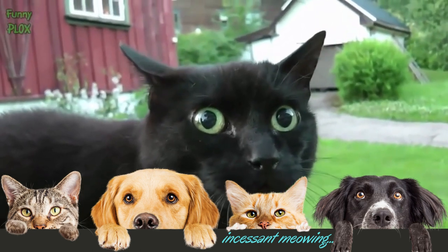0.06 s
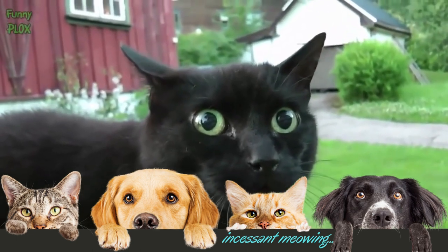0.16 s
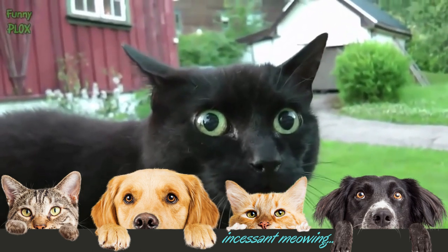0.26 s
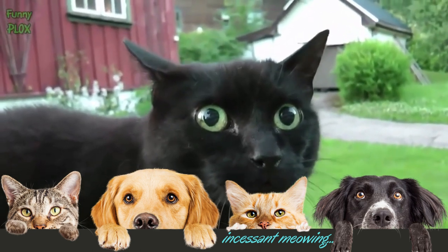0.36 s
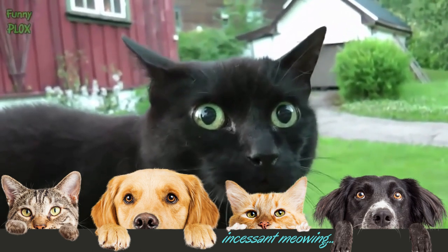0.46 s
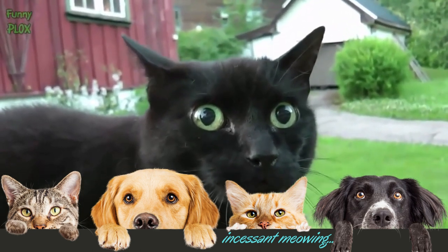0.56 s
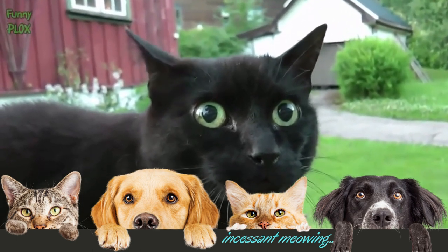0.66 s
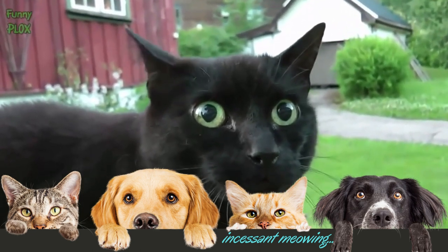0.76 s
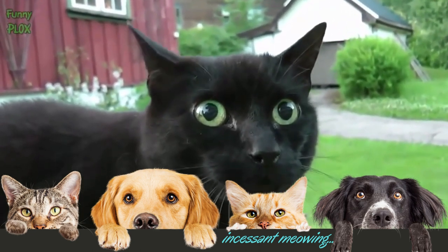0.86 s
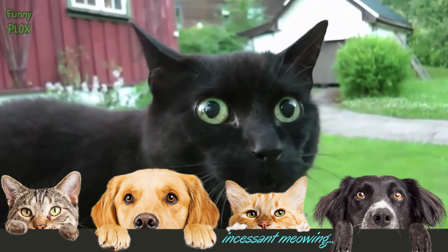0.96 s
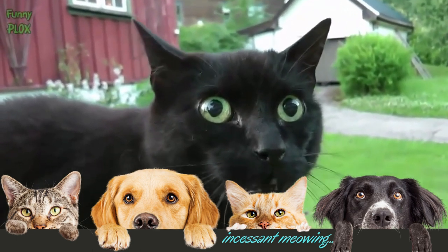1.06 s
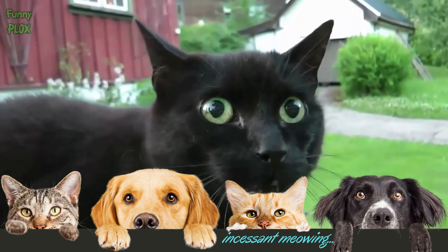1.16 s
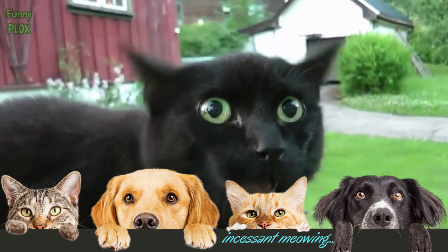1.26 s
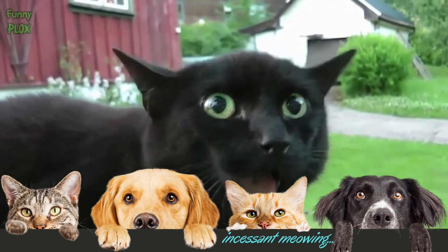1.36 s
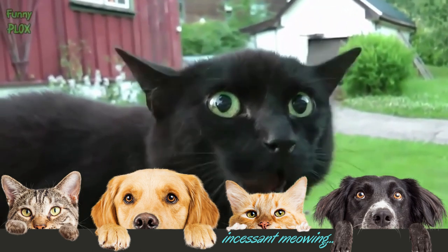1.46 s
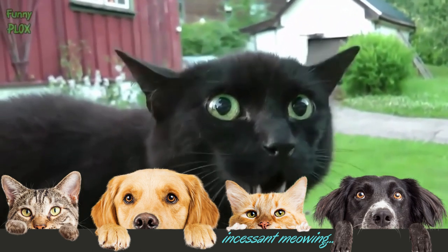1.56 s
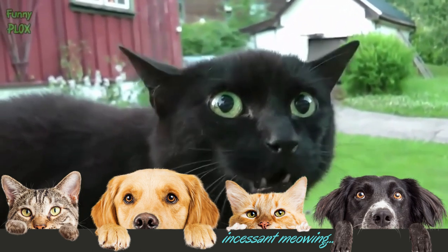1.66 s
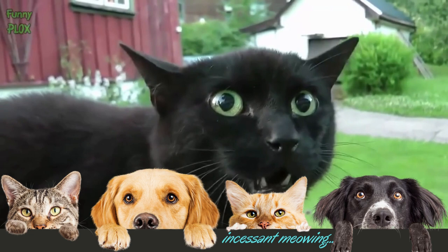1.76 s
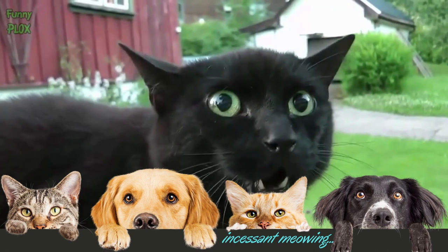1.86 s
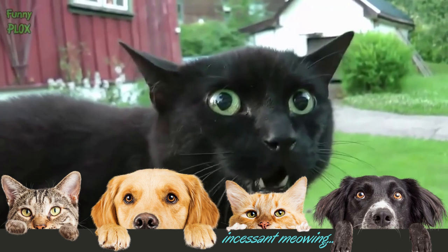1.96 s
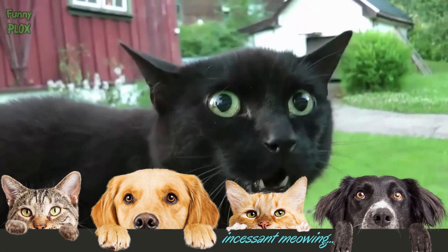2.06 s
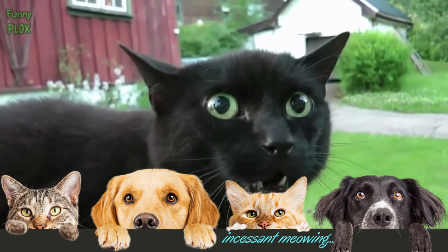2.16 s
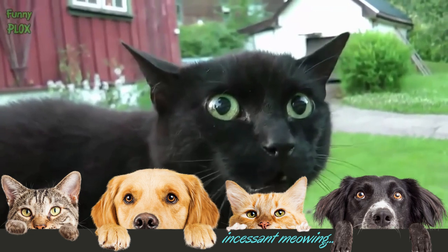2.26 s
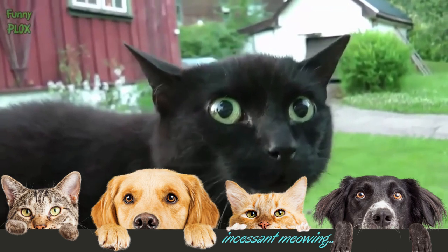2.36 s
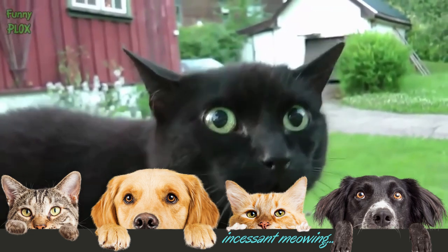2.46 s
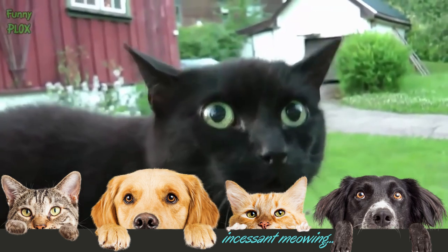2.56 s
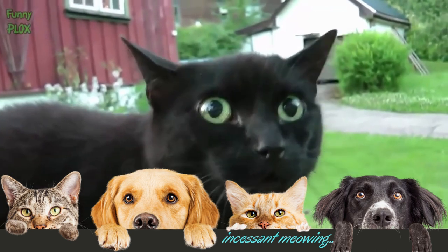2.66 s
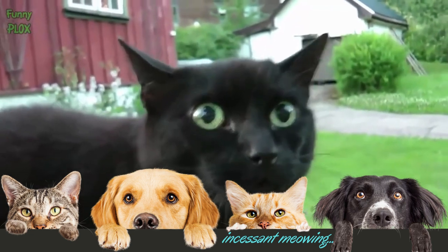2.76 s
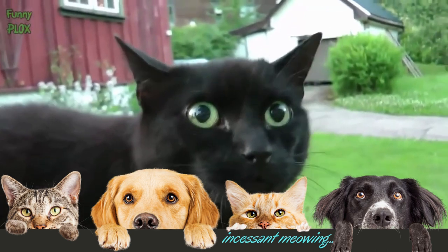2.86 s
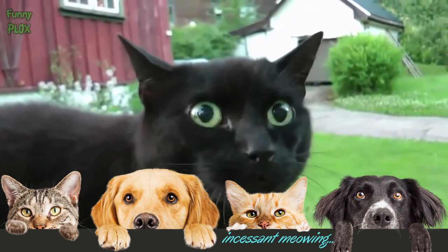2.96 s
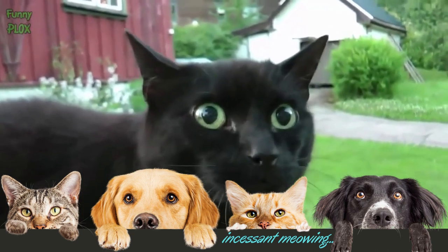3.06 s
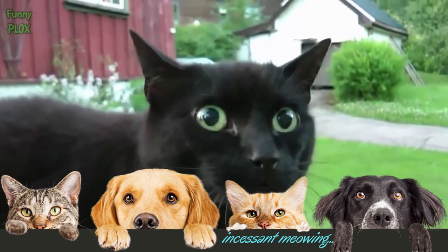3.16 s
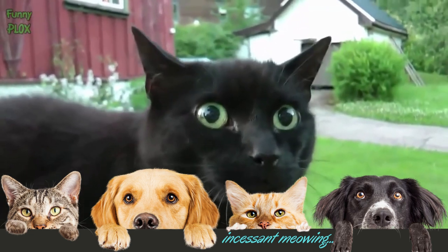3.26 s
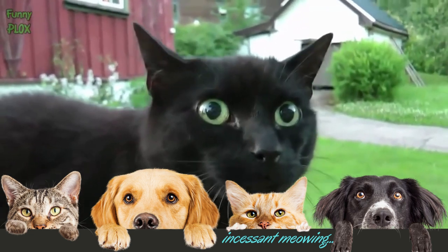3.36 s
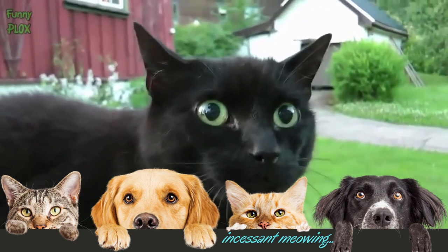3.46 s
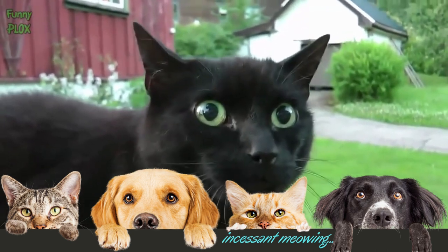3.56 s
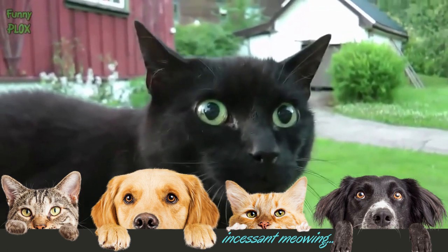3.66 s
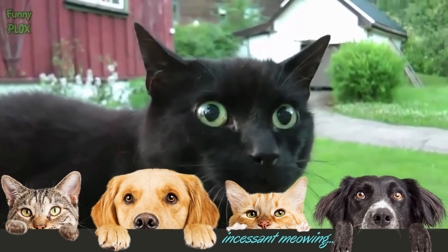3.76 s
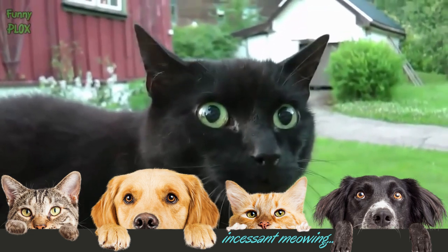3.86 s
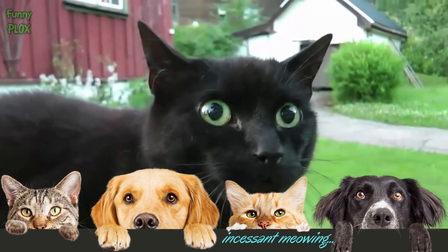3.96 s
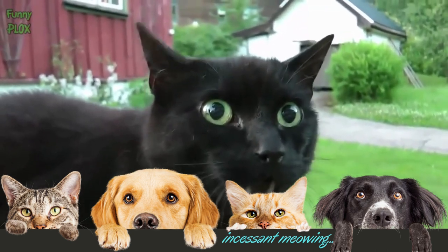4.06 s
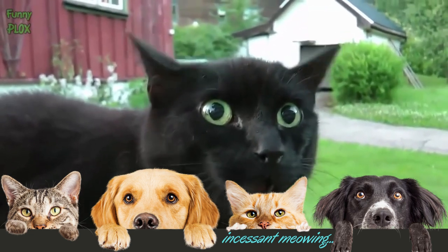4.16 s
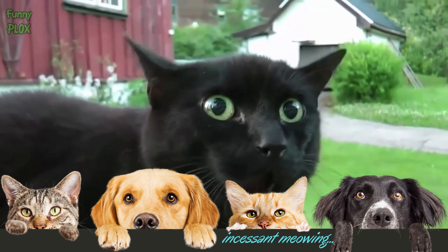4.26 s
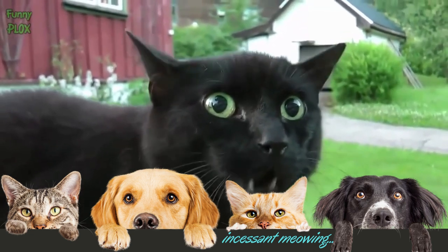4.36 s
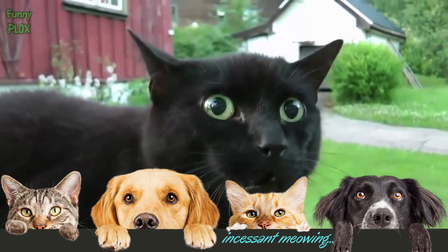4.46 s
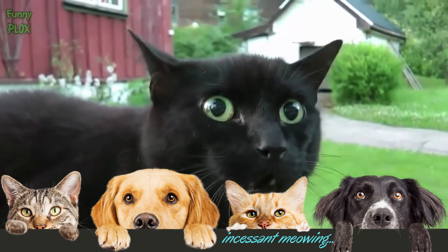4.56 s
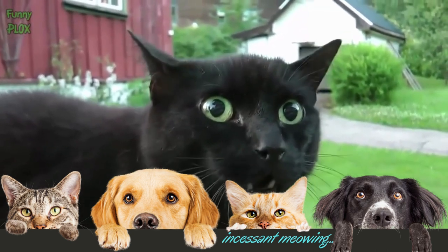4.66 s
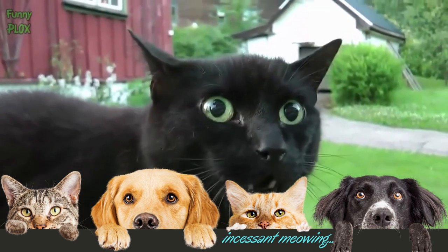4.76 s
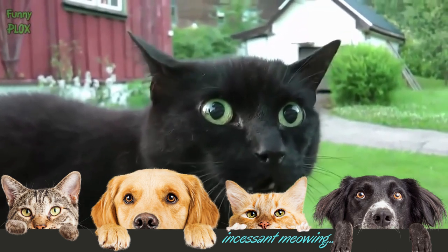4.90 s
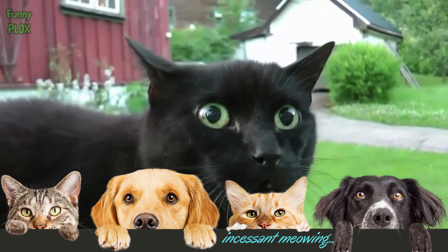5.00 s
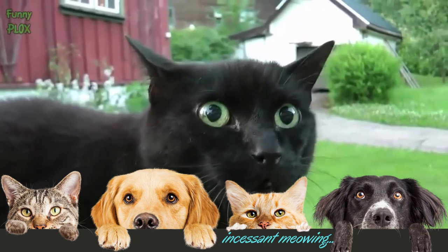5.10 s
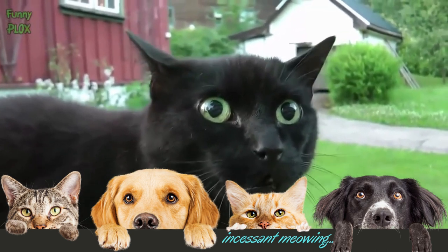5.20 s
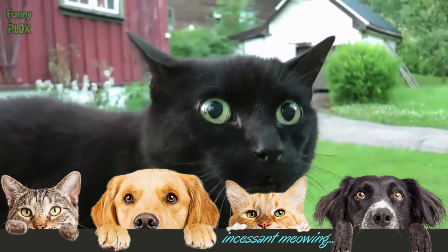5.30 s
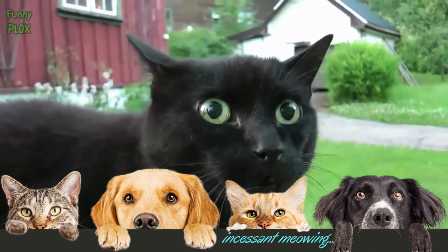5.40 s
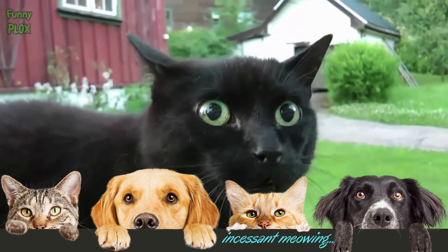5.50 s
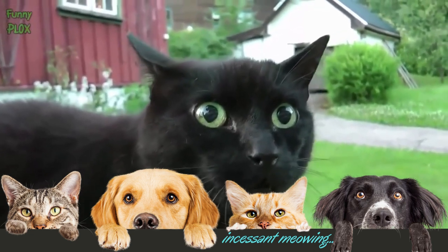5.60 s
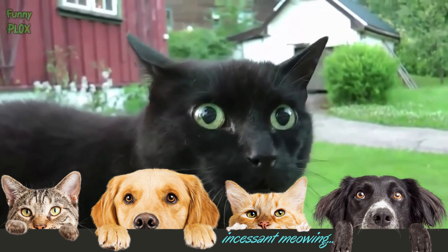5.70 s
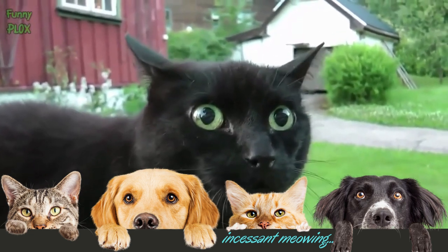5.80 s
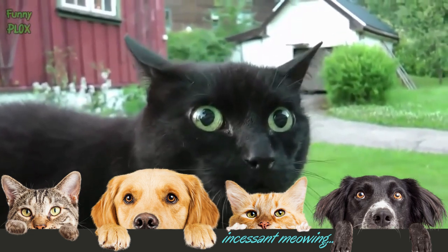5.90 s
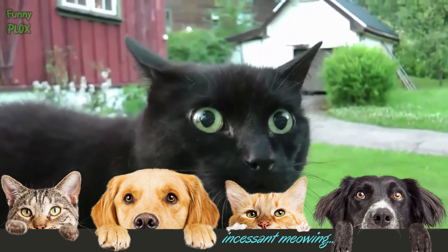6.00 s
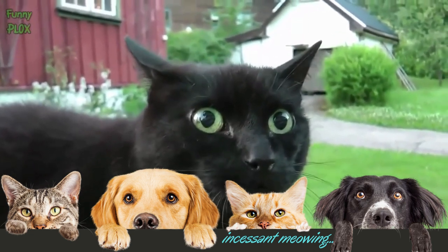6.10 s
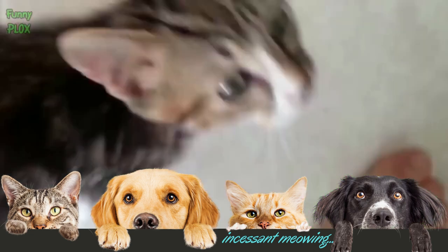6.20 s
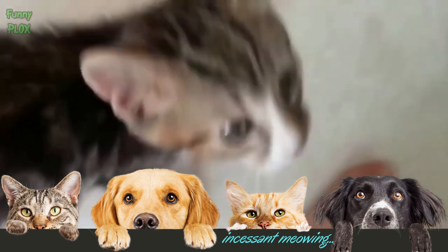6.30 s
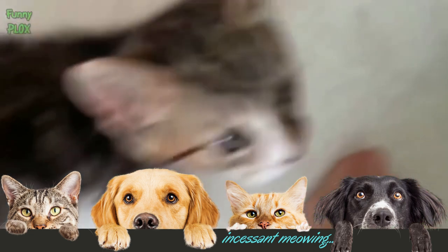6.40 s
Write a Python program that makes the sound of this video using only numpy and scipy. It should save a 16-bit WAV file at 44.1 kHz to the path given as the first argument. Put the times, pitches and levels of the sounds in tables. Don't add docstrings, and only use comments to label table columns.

```python
import sys
import numpy as np
from scipy import signal
from scipy.fft import rfft, irfft
from scipy.io import wavfile
from scipy.ndimage import uniform_filter1d

SR = 44100
rng = np.random.default_rng(int(sys.argv[2]) if len(sys.argv) > 2 else 0)


def to_wav(sig):
    pcm = np.clip(np.atleast_2d(sig), -1, 1) * 32767
    pcm = np.round(pcm).astype(np.int16)
    wavfile.write(sys.argv[1], SR, pcm.T)


def convert_level_to_amplitude(level_db):
    exponent = np.asarray(level_db, float) / 20
    return 10 ** exponent


N = 284004

# [t/s, f/Hz]
YOWL_PITCH = [
    [(-.06, 372)],
    [(1.425, 473.6), (1.5, 491), (1.6, 473.3), (1.68, 452.7), (1.78, 463), (1.86, 478.3), (2.31, 462.2),
     (2.53, 428.3), (2.755, 405.7)],
    [(4.305, 485.5), (4.417, 514.4), (4.54, 430.6), (4.66, 458.5), (4.77, 465.7), (4.92, 475),
     (5.12, 471.1), (5.33, 456.2), (5.62, 424.6)],
]
# [t/s, level/dB]
YOWL_EFFORT = [
    [(-.06, -37.5)],
    [(1.425, -37.5), (1.51, -31.5), (1.58, -23), (1.765, -25), (1.805, -31.5), (2.0, -24.5), (2.46, -27.5),
     (2.54, -27), (2.6, -28.5)],
    [(4.305, -33), (4.39, -34), (4.454, -26), (4.54, -25), (4.583, -36), (4.75, -27), (5.0, -30),
     (5.318, -29.5), (5.55, -28.5)],
]
# [t/s, mouth f/Hz, throat f/Hz, edge f/Hz]
YOWL_VOWEL = [
    [(-.06, 900, 2150, 4900)],
    [(1.425, 1269, 2696, 5170), (1.49, 1850, 2900, 4930), (1.57, 1820, 2730, 4790),
     (1.765, 1443, 2626, 4600), (1.89, 1252, 2638, 5020), (2.31, 1250, 2627, 4950),
     (2.44, 1070, 2554, 4840), (2.51, 860, 2600, 4630), (2.75, 797, 2390, 4590)],
    [(4.305, 1410, 2800, 4900), (4.39, 1860, 2810, 4830), (4.454, 1632, 2604, 4670),
     (4.54, 1460, 2334, 4110), (4.657, 1064, 2360, 4010), (4.77, 1170, 2370, 4700),
     (4.95, 1196, 2550, 4860), (5.318, 842, 2443, 4890), (5.72, 864, 2403, 4720)],
]
# [voice catches t/s, closing gulp t/s, puff level/dB, bright edge level/dB]
YOWL_ENDS = [
    (-.2, .03, -47, 17),
    (2.773, 2.924, -44.5, 3.5),
    (5.576, 6.009, -46, 1),
]
# [t from the gulp/s, pitch f/Hz, mouth f/Hz, throat f/Hz, edge f/Hz]
GULP = [
    (-.075, 372.3, 875, 2250, 4520),
    (-.022, 353, 880, 2170, 4480),
    (-.01, 317, 900, 2400, 4620),
    (0.031, 330, 820, 2300, 4630),
]
# [t/s, sag f/Hz, half length t/s]
CRACKS = [
    (1.45, 35.3, 0.011),
    (1.554, 12.7, 0.011),
    (2.564, 5.07, 0.013),
    (4.449, 32, 0.019),
    (5.533, 3, 0.034),
]
# [f/Hz, level/dB]
CHEST = [(322, -28), (355, -39.5), (405, -40.5), (440, -52.5), (470, -58.5), (500, -66)]
# [mouth f/Hz, throat level/dB, edge level/dB]
OPENING = [(761, -11, -28), (995, -2, -21), (1250, 0.4, -21.5), (1465, 0.5, -27.5), (1850, -1, -31.5)]
# [f/Hz, level/dB]
EDGE = [(3000, -17.5), (3400, -15), (4200, -20), (4700, -5.5), (5200, -2), (5800, -16.5), (6600, -6),
        (7400, -23.5), (8600, -21), (9800, -32), (11000, -30.5), (12000, -37.5), (13200, -21.5),
        (15000, -44)]
# [start t/s, peak t/s, peak level/dB]
RASPS = [
    (1.436, 1.521, -40.5),
    (4.287, 4.466, -39.5),
]
# [f/Hz, width f/Hz, level/dB]
AIRWAY = [(1223, 360, -6), (2217, 550, 3.5), (2900, 1320, -8.5), (5500, 1900, -20.5)]
# [f/Hz, left minus right level/dB, left lead/rad]
NEAR_SIDE = [(330, 2, -0.43), (470, -9, -.5), (900, -3, 0.36), (1400, -4.5, 0.32), (1900, -0.5, 0.045),
             (2200, -3.5, 0.3), (2800, -1.5, -0.038), (7000, 0.5, -0.041)]
# [t/s, pitch f/Hz, effort level/dB]
MOANS = [
    [(.495, 540, -94), (.535, 470, -76), (.563, 417, -57), (.63, 416, -53), (.67, 410, -41.5),
     (.72, 419, -44.5), (.8, 428.7, -44), (1.17, 421.8, -45.5), (1.545, 402, -48)],
    [(3.33, 381, -74), (3.346, 384, -63), (3.416, 538, -79), (3.46, 491, -77), (3.488, 420, -54),
     (3.6, 409.4, -40.5), (3.78, 426, -42), (4.15, 402, -41), (4.51, 396, -45.5)],
]
# [gulp t/s, gulp f/Hz, nose leak level/dB]
MOAN_ENDS = [
    (1.577, 317, -10.5),
    (4.544, 326, -14),
]
# [f/Hz, level/dB]
FAR_CHEST = [(325, -34.5), (390, -42.5), (412, -43.5), (428, -47), (470, -52), (535, -53)]
# [f/Hz, level/dB]
NOSE = [(1250, -14.5), (1700, -8), (2100, -2), (2500, -28), (4200, -28), (4700, -15), (5100, -15.5),
        (5450, -8), (5900, -15), (6800, -32)]
# [f/Hz, left minus right level/dB, left lead/rad]
FAR_SIDE = [(341, -4.5, 0), (420, -4.5, 0.037), (804, -8.5, 0.0078), (1250, -19.5, 0), (2250, 5.5, 0),
            (7000, -2, 0.015)]
# [t/s, peak level/dB]
TICKS = [(0.9617, -49.5), (1.1564, -46.5), (1.2658, -48), (3.4298, -45.5), (3.4842, -50.5), (3.56, -50.5),
         (3.624, -46), (3.68, -43), (3.741, -42.5), (3.8252, -44), (3.9171, -42.5), (4.0489, -43),
         (5.644, -47), (5.706, -49.5), (5.8223, -45), (5.8759, -47), (5.94, -47.5), (6.0424, -46.5)]
# [delay t/s, level/dB]
BUSH_ECHOES = [(0.014, 0), (.022, 0)]
# [t/s, peak level/dB, f/Hz]
TAPS = [
    (.631, -45.5, 2800),
    (3.162, -57, 1900),
    (3.302, -50, 1900),
    (4.293, -35, 1360),
    (4.338, -34.5, 416),
    (5.856, -35, 1880),
    (6.357, -37, 2490),
    (6.3628, -31, 1690),
    (6.363, -39.5, 484),
]
# [f/Hz, level per Hz/dB]
GARDEN = [(18, -37.5), (30, -45.5), (48, -10.5), (87, -11), (122, -4.5), (288, -11), (497, -25),
          (552, -21.5), (754, -20.5), (953, -26), (1270, -31.5), (1650, -32), (2130, -34.5), (5880, -28),
          (15000, -38)]
# [f/Hz, likeness/1]
GARDEN_ALIKE = [(60, 0.64), (150, 0.78), (400, 0.036), (1000, 0.2), (2400, 0.97), (6000, 0.71),
                (14000, 0.95)]
# [t/s, level/dB]
DRONE = [(0, -68), (.3, -42), (.6, -53), (1.8, -44), (2.2, -37), (2.6, -42), (2.9, -45), (3.6, -50),
         (4.6, -77.5), (6.44, -76)]
# [f/Hz, level per Hz/dB]
ROOM = [(59, -57), (100, -27), (176, -8), (297, -1), (1210, -10.5), (3760, -11.5), (15000, -30.5)]
# [t/s, level/dB]
ROOM_FADE = [(6.33, -64), (6.342, -49.5), (6.37, -46), (6.44, -41)]
# [f/Hz, level/dB]
DROPPED = [(500, -70), (3000, -52.5), (6000, -61.5), (8500, -53), (12000, -52.5), (15000, -53.5)]
SIDES = np.array([[0.5], [-0.5]])


def in_time(rows, t):
    s, *columns = np.transpose(rows)
    return [np.interp(t, s, c) for c in columns]


def at_hz(points, hz, axis=1):
    points = np.array(points)
    return np.interp(np.log(hz), np.log(points[:, 0]), points[:, axis])


def drift(rate, size):
    r = np.exp(-2 * np.pi * rate / SR)
    slow = signal.lfilter([1], [1, -2 * r, r * r], rng.standard_normal(size + 20000))[20000:]
    return slow / slow.std()


def resonance(x, hz, width_hz):
    r = np.exp(-np.pi * width_hz / SR)
    zeros = np.array([1, 0, -1]) * (1 - r * r) / 2
    return signal.lfilter(zeros, [1, -2 * r * np.cos(2 * np.pi * hz / SR), r * r], x)


def vocal_folds(out, rows, partial, ports, count, jitter, shimmer_db):
    first, last = round(rows[0][0] * SR), min(round(rows[-1][0] * SR), N)
    t = np.arange(first, last) / SR
    step = 32
    pitch, *controls = in_time(rows, t)
    pitch = pitch * (1 + jitter * drift(64, len(t)))
    phase = 2 * np.pi * np.cumsum(pitch) / SR
    onset = t - rows[0][0] + (first == 0)
    fade = np.clip(np.minimum(onset, t[-1] - t) / 0.0039, 0, 1)
    shimmer = [drift(31, len(t)) for _ in range(3)]
    flutter = [drift(7, len(t)) for _ in range(5)]
    for k in range(1, count + 1):
        hz = k * pitch[::step]
        height, lag = partial(k, hz, [c[::step] for c in controls])
        sway_db = shimmer_db * shimmer[k % 3][::step] + 2.5 * (k > 6) * flutter[k % 5][::step]
        height = height * convert_level_to_amplitude(sway_db + SIDES * at_hz(ports, hz))
        shift = SIDES * at_hz(ports, hz, axis=2) - lag
        for side in range(2):
            wave = np.cos(k * phase + np.interp(t, t[::step], shift[side]))
            out[side, first:last] += np.sqrt(2) * fade * np.interp(t, t[::step], height[side]) * wave


def yowl(pitch, effort, vowel, ends):
    drop_s, drop_db, drop_hz = 0.011, 4.5, 3.8
    swell_s, swell_db = 0.018, 3.5
    stutter, stutter_s = 0.012, 0.13
    choke_db, choke_s = -27, 0.029
    catch, gulp, _, bright_db = ends
    shut = np.array(GULP) + [gulp, 0, 0, 0, 0]
    t = np.arange(max(pitch[0][0], 0), shut[-1, 0], 0.002)
    pitch_hz, = in_time(np.vstack([pitch, shut[:, :2]]), t)
    mouth_hz, throat_hz, edge_hz = in_time(np.vstack([vowel, shut[:, [0, 2, 3, 4]]]), t)
    effort_db, = in_time(effort, t)
    age = t - pitch[0][0] + (catch < 0)
    caught = np.clip((t - catch) / drop_s, 0, 1) * (catch > 0)
    since_catch = (t - catch) * caught

    sag_hz = sum(hz * np.exp(-((t - s) / half) ** 2) for s, hz, half in CRACKS)
    pitch_hz = uniform_filter1d(pitch_hz, size=7) - sag_hz - drop_hz * caught * np.exp(-since_catch / 0.073)
    slack = 0.003 * np.clip((440 - pitch_hz) / 60, 0, 1)
    waver = stutter * (age < stutter_s) + slack
    pitch_hz = pitch_hz * (1 + waver * drift(70, 88 * len(t))[::88])

    swell = np.exp(np.minimum(t - catch, 0) / swell_s) * (1 - caught)
    catch_db = swell_db * swell - drop_db * caught
    muted_db = 811 * np.maximum(t - gulp + 0.012, 0)
    mouth_db = effort_db + catch_db - muted_db
    chest_db = at_hz(CHEST, pitch_hz) - 800 * np.maximum(t - gulp - 0.011, 0)
    weak_db = 0.236 * np.minimum(pitch_hz - 450, 0) + choke_db * np.exp(-(age / choke_s) ** 2)
    lift_db = 5 * caught * np.exp(-since_catch / 0.12)
    throat_db = effort_db + at_hz(OPENING, mouth_hz) + weak_db - 0.34 * muted_db + lift_db
    edge_db = effort_db + at_hz(OPENING, mouth_hz, axis=2) + bright_db + 0.43 * weak_db
    return np.transpose([t, pitch_hz, chest_db, mouth_hz, mouth_db, throat_hz, throat_db, edge_hz, edge_db])


def open_mouth(k, hz, controls):
    chest_db, mouth_hz, mouth_db, throat_hz, throat_db, edge_hz, edge_db = controls
    if k == 1:
        return convert_level_to_amplitude(chest_db), 0
    skirt = 1.907
    mouth = (hz - mouth_hz) / 146
    throat = (hz - throat_hz) / 168.7
    power = convert_level_to_amplitude(2 * mouth_db) / (1 + mouth ** 2) ** skirt
    power = power + convert_level_to_amplitude(2 * throat_db) / (1 + throat ** 2) ** skirt
    between = (hz > mouth_hz) * (hz < throat_hz)
    power = power + convert_level_to_amplitude(mouth_db + throat_db - 32.5) * between
    power = power / (1 + (hz / 3050) ** 12.2)
    shape_db = at_hz(EDGE, hz * 5000 / edge_hz)
    power = power + convert_level_to_amplitude(2 * (edge_db + shape_db)) * (hz > 2900)
    return np.sqrt(power), 1.68 * (np.arctan(mouth) + np.arctan(throat))


def breath_level(yowls):
    t, power, puffs, hiss = np.arange(N) / SR, 0, 0, 0
    for rows, (_, gulp, puff_db, _) in zip(yowls, YOWL_ENDS):
        late = t - gulp - 0.015
        throat_db = np.interp(t, rows[:, 0], rows[:, 6], -99, -99)
        power = power + convert_level_to_amplitude(2 * (throat_db - 32))
        decay_db = np.where(late < 0, (late / 0.0097) ** 2, 192 * np.maximum(late - 0.035, 0))
        puff = convert_level_to_amplitude(puff_db - decay_db)
        puffs = puffs + puff
        hiss = hiss + puff * convert_level_to_amplitude(14.5) * np.exp(-np.maximum(late, 0) / 0.043)
    for start, peak, peak_db in RASPS:
        rise_db = np.interp(t, [start - 0.03, start, peak - 0.042, peak], [-90, -52.5, -52.5, peak_db])
        power = power + convert_level_to_amplitude(2 * (rise_db - 199 * np.maximum(t - peak, 0)))
    return np.sqrt(power + puffs ** 2), hiss


def breath(yowls):
    air = rng.standard_normal(N)
    bands = []
    for k, (hz, width, db) in enumerate(AIRWAY):
        bands.append((-1) ** k * convert_level_to_amplitude(db) * resonance(resonance(air, hz, width), hz, width))
    low, high = sum(bands[:-1]), bands[-1]
    flow, hiss = breath_level(yowls)
    noise = ((low + high) * flow + high * hiss) / low.std()
    return noise * convert_level_to_amplitude(2 * drift(30, N)) * convert_level_to_amplitude([[-0.8], [0.8]])


def near_cat():
    out = np.zeros((2, N))
    yowls = [yowl(*controls) for controls in zip(YOWL_PITCH, YOWL_EFFORT, YOWL_VOWEL, YOWL_ENDS)]
    for rows in yowls:
        vocal_folds(out, rows, open_mouth, NEAR_SIDE, count=32, jitter=0.0021, shimmer_db=0.86)
    return out + breath(yowls)


def moan(rows, ends):
    gulp, gulp_hz, nose_db = ends
    end = gulp + 0.021
    t = np.arange(rows[0][0], end, 0.002)
    pitch_hz, effort_db = in_time(rows + [(gulp, gulp_hz, -53), (end, gulp_hz, -61)], t)
    shut_db = 3.6 * np.minimum(effort_db + 47.5, 0)
    tired_db = 6.5 * (t - t[0])
    leak_db = effort_db + nose_db + shut_db - tired_db
    return np.transpose([t, pitch_hz, at_hz(FAR_CHEST, pitch_hz), effort_db, leak_db])


def shut_mouth(k, hz, controls):
    chest_db, effort_db, leak_db = controls
    if k == 1:
        height = convert_level_to_amplitude(chest_db)
    elif k == 2:
        height = convert_level_to_amplitude(effort_db)
    else:
        height = convert_level_to_amplitude(leak_db + at_hz(NOSE, hz))
    return height, 0.99 * k


def far_cat():
    out = np.zeros((2, N))
    for rows, ends in zip(MOANS, MOAN_ENDS):
        vocal_folds(out, moan(rows, ends), shut_mouth, FAR_SIDE, count=15, jitter=0.002, shimmer_db=0.5)
    return out


def wall_echo(voices):
    walls = rng.standard_normal((2, 6000)) * convert_level_to_amplitude(-56 - 60 * np.arange(6000) / SR / 0.25)
    return signal.fftconvolve(voices, walls, axes=1)[:, :N]


def bird():
    t, direct = np.arange(round(0.012 * SR)) / SR, np.zeros(N)
    shape = np.sin(np.pi * (t / t[-1]) ** 0.52) ** 2
    for s, db in TICKS:
        hz = (7300 - 3900 * np.exp(-t / 0.00278)) * (1 + rng.normal(0, 0.012))
        phase = 2 * np.pi * np.cumsum(hz) / SR
        at = round((s - 0.002) * SR)
        whistle = np.sin(phase) + convert_level_to_amplitude(-7.5) * np.sin(1.17 * phase)
        direct[at:at + len(t)] += convert_level_to_amplitude(db) * shape * whistle
    scatter = rng.standard_normal((2, 4000)) * convert_level_to_amplitude(-20 - 60 * np.arange(4000) / SR / 0.25)
    for s, db in BUSH_ECHOES:
        scatter[:, round(s * SR)] += convert_level_to_amplitude(db)
    scatter = 2 * resonance(scatter, 9660, 1750)
    scatter[:, 0] = 1
    return signal.fftconvolve(direct[None], scatter, axes=1)[:, :N]


def taps():
    out, t = np.zeros(N), np.arange(400) / SR
    for s, db, hz in TAPS:
        at = round(s * SR)
        out[at:at + 400] += convert_level_to_amplitude(db) * np.sin(2 * np.pi * hz * t) * np.exp(-t * hz * 0.31)
    return out


def wash(spectrum, likeness):
    hz = np.maximum(np.arange(N // 2 + 1) * SR / N, 1)
    mid, side = rfft(rng.standard_normal((2, N))) * convert_level_to_amplitude(at_hz(spectrum, hz))
    alike = np.clip(at_hz(likeness, hz), 0, 1)
    out = irfft(np.sqrt(1 + alike) * mid + np.sqrt(1 - alike) * side * 2 * SIDES, N)
    return out / out.mean(0).std()


def motor():
    t = np.arange(N) / SR
    drone = resonance(resonance(rng.standard_normal(N), 116.8, 3.8), 116.8, 3.8)
    drone = drone / drone.std() * convert_level_to_amplitude(in_time(DRONE, t)[0] - 16.5)
    whine = convert_level_to_amplitude(-75.5) * np.sin(2 * np.pi * 940 * t + 0.76 * drift(4, N))
    return drone + whine


def garden():
    return convert_level_to_amplitude(-55.5 + 1.0 * drift(2.34, N)) * wash(GARDEN, GARDEN_ALIKE)


def last_room():
    t = np.arange(N) / SR
    level = convert_level_to_amplitude(in_time(ROOM_FADE, t)[0] + 2.0 * drift(60, N)) * (t > ROOM_FADE[0][0])
    return level * wash(ROOM, [(60, 0.11), (4000, 0.2), (14000, 0.93)])


def scene():
    voices = near_cat() + far_cat()
    background = motor() + garden() + last_room()
    return voices + wall_echo(voices) + bird() + taps() + background


def spectral_gate(x, follow=0.64, quiet_db=-43, local_db=-16.0, moody_db=1.5, size=1024):
    hz, _, lines = signal.stft(x, SR, nperseg=size)
    power = np.mean(abs(lines) ** 2, axis=0) + 1e-20
    loud_db = np.maximum(10 * np.log10(power.sum(axis=0)), quiet_db)
    loud_db = loud_db + moody_db * rng.standard_normal(len(loud_db))
    local_db = local_db - 20 * (hz < 2800)[:, None]
    near = uniform_filter1d(power, size=21, axis=0)
    smooth = uniform_filter1d(uniform_filter1d(power, size=3, axis=0), size=3, axis=1)
    limit = convert_level_to_amplitude(2 * (follow * (loud_db + 43.0) - 40.5 + at_hz(DROPPED, hz + 1)[:, None]))
    band = uniform_filter1d(uniform_filter1d(power, size=5, axis=0), size=3, axis=1)
    kept = (smooth > near * convert_level_to_amplitude(2 * local_db)) & (band > limit)
    kept = kept | (hz < 450)[:, None]
    return signal.istft(lines * kept, SR, nperseg=size)[1][:, :N]


def band_limit(x):
    return signal.sosfilt(signal.butter(12, 15540, fs=SR, output="sos"), x)


def record(dry):
    mix = spectral_gate(dry)
    return band_limit(mix)


dry = scene()
out = record(dry)
to_wav(out)
```